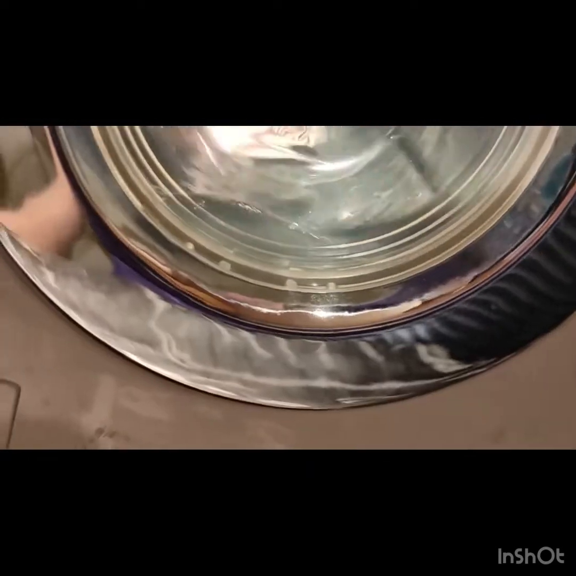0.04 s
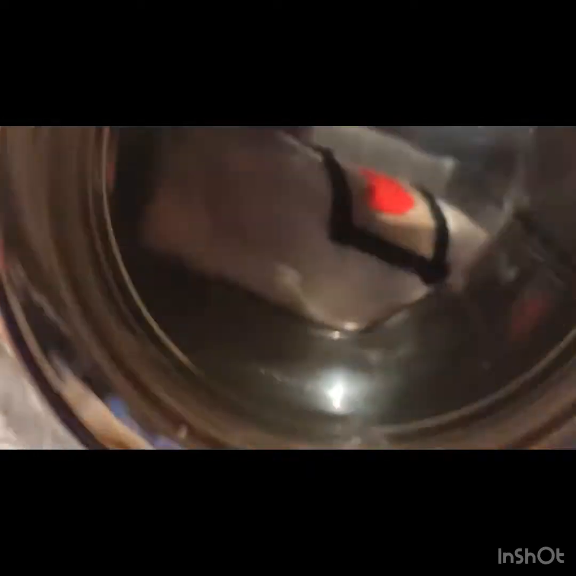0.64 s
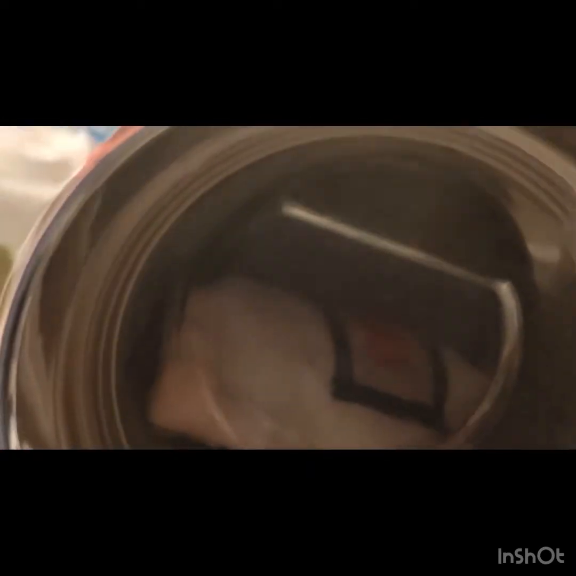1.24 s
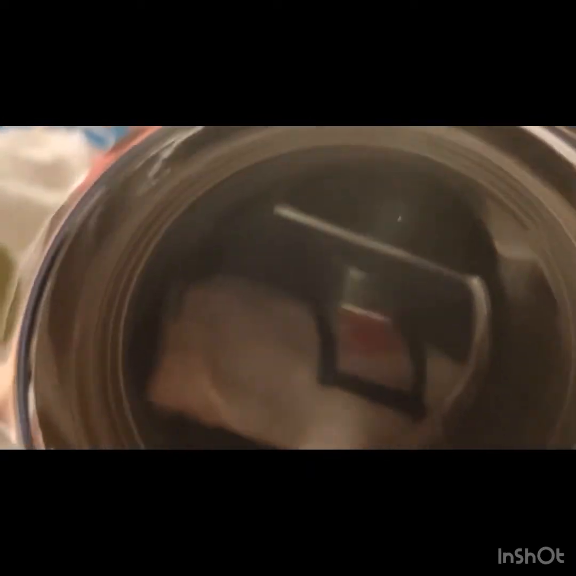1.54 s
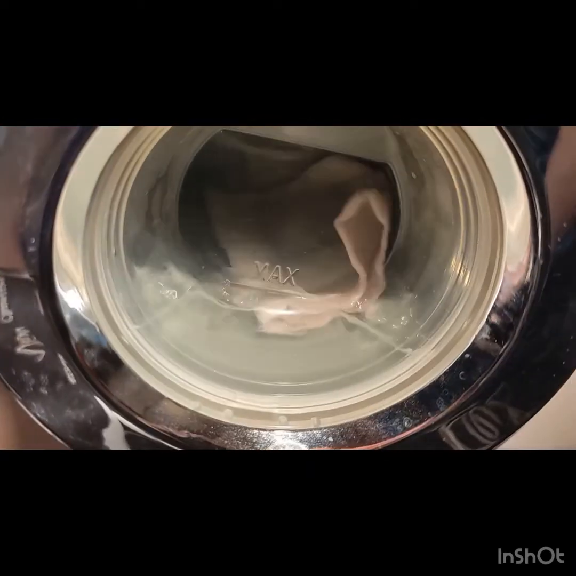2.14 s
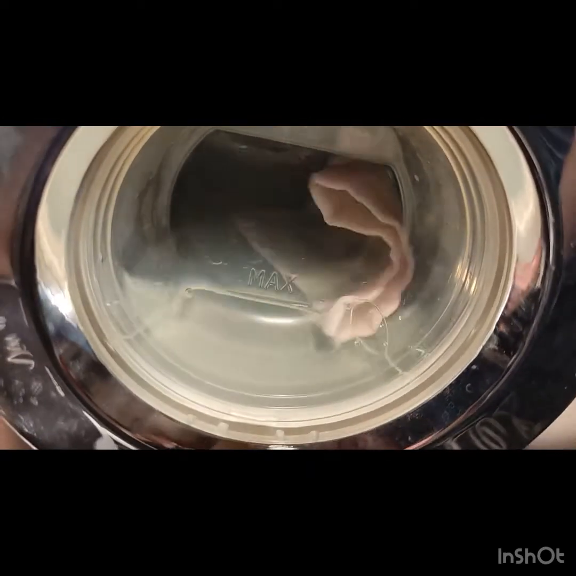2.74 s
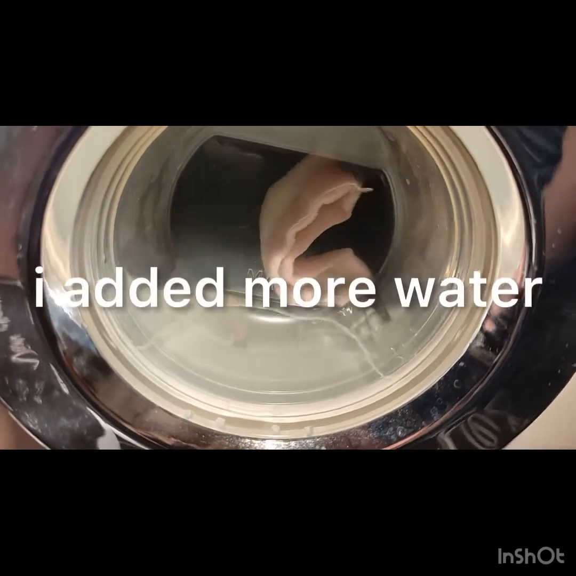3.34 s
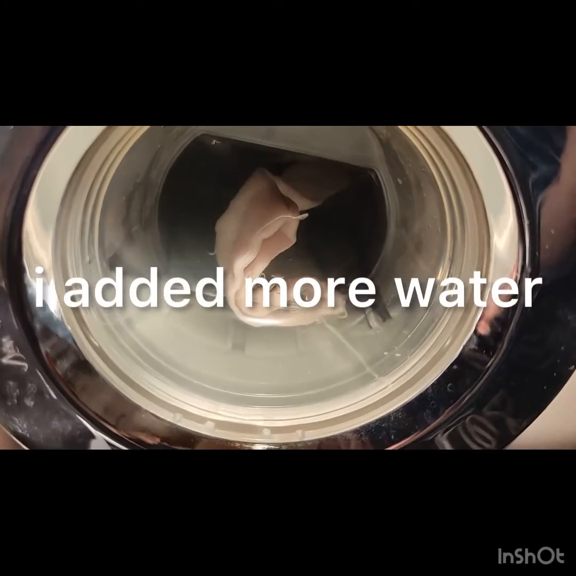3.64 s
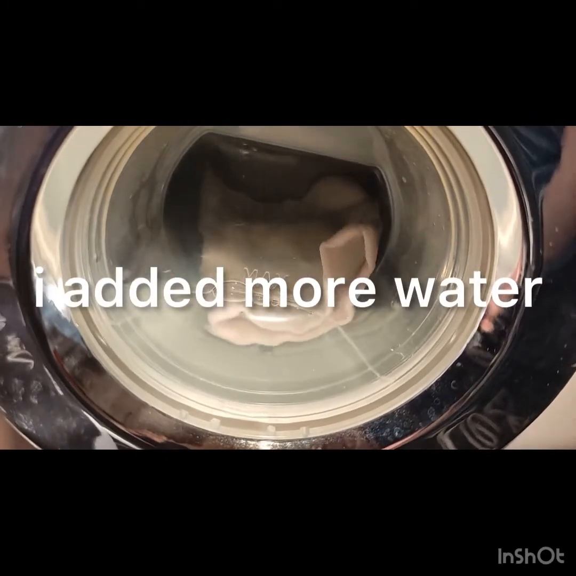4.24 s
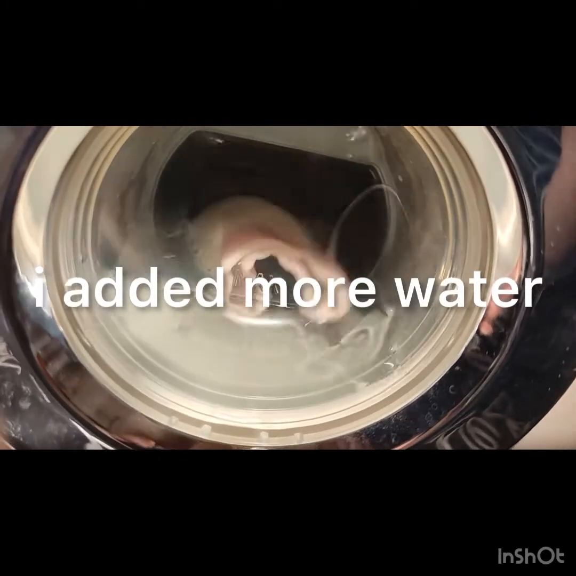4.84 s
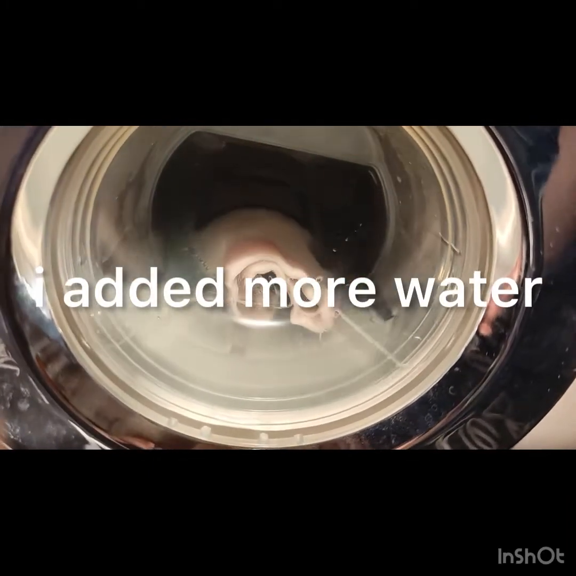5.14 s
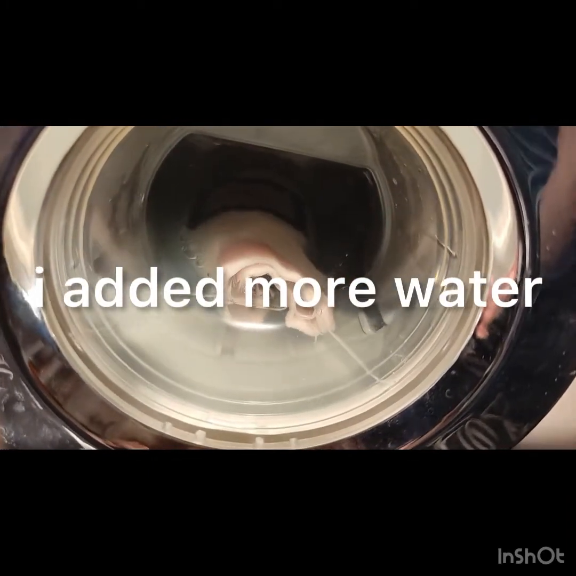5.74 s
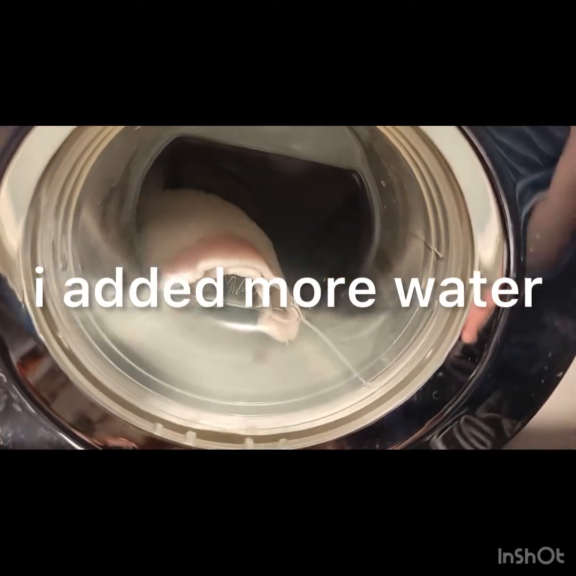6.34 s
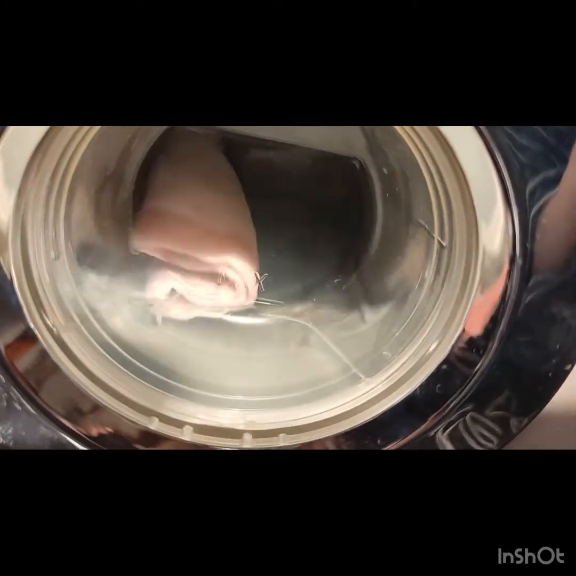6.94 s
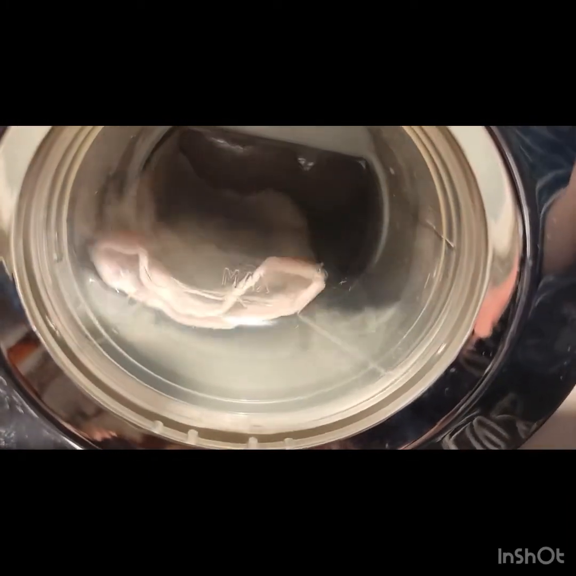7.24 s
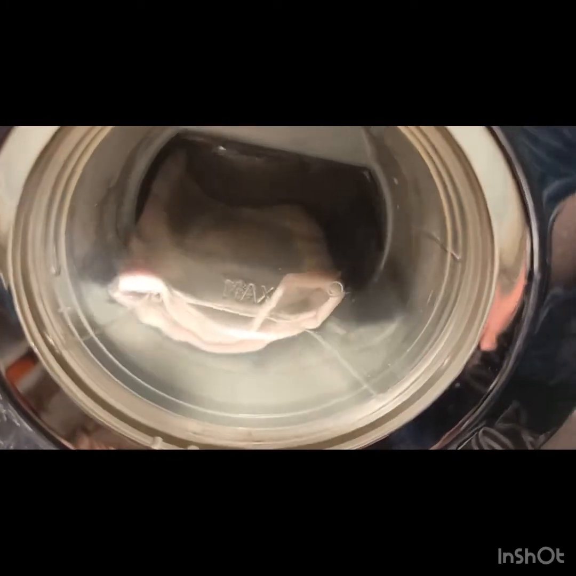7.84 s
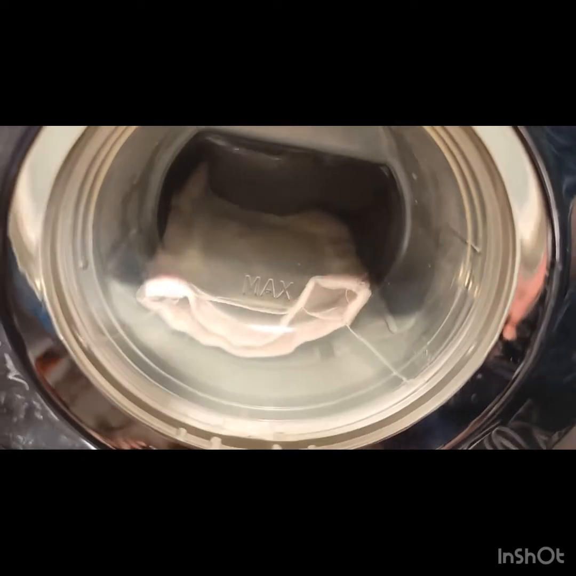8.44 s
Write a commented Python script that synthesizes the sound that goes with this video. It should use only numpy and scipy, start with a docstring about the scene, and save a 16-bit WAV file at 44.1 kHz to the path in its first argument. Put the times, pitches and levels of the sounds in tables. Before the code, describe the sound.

A small toy washer hums low while little waves and a wet cloth knock irregularly in its plastic tub, dripping and gurgling.

```python
"""Small waves slap and thump in a humming toy washing machine, heard just in front of its plastic door.
The drum turns a wet cloth in a little water: waves smack the wall and trap bubbles, cloth and water
knock the hollow tub, motor and drum keep its modes ringing. Water trickles and fizzes; droplets tick.
Early on, something brushes past the right microphone and the sound drops out for a moment."""
import sys
import numpy as np
from scipy import signal
from scipy.fft import rfft, irfft
from scipy.io import wavfile
from scipy.ndimage import uniform_filter1d

SR = 44100
rng = np.random.default_rng(int(sys.argv[2]) if len(sys.argv) > 2 else 0)


def materialize(psi):
    """Save the field psi as 16-bit PCM at rate SR to the path in sys.argv[1].

    A 1-D psi becomes a single channel; in a 2-D psi each row is a channel.
    """
    bounded = np.clip(np.atleast_2d(psi).T, -1, 1)
    quanta = np.round(bounded * 32767).astype(np.int16)
    wavfile.write(sys.argv[1], SR, quanta)


N = 378819
T = np.arange(N) / SR
EVENT_T = T[:SR // 3]
SWELL_LEAD_S = .04  # a wave swells this long before it hits
SLAP_HZ = 956  # reference pitch; smaller air pockets sound higher
# Low modes of tub and water: freq_hz, gain_db, t60_s
TUB_MODES = [(76, -29.5, 0.22), (117.3, -9.5, 0.15), (153, -12, 0.17), (175, -9, 0.22), (190.4, -2, 0.24),
             (231.8, -6, 0.16), (242.1, -0.5, 0.17), (280, -8.5, 0.18), (306, -3, 0.23), (363, -0.5, 0.18),
             (405.8, -3.5, 0.19)]
# Spectrum of droplets and foam: freq_hz, gain_db
DROPLET_EQ = [(1000, -11), (3000, -6.5), (5500, 0.5), (9000, 0.5), (12500, -11.5), (15500, -18)]


def waves():
    """Each wave slaps the wall, then thumps the tub; big ones land in two or three quick blows."""
    # Wave hits, before trims: start_s, slap_db, thump_db, thud_db, spray_db, pitch_hz
    hits = [(0.009, -30, -32.5, -60, -50.5, 970), (0.1, -42.5, -47, -60, -58, 1095),
            (0.269, -43, -51, -66, -79, 1350), (0.292, -40, -41, -64, -76, 926),
            (0.48, -46, -47.5, -54, -66, 1120), (0.514, -42, -41.5, -53, -74, 1250),
            (0.531, -43.5, -39, -59, -81, 850), (0.769, -39, -40, -48, -53.5, 1034),
            (0.831, -43.5, -44.5, -60, -85, 846), (0.956, -43, -48, -58, -69, 1030),
            (1.641, -36.5, -49.5, -53, -51.5, 1047), (1.969, -35, -30, -44, -57, 704),
            (2.006, -42.5, -41, -53, -61, 1420), (2.063, -34, -39.5, -53, -56, 930),
            (2.075, -39.5, -44, -58, -49.5, 835), (2.107, -34, -36, -52, -46.5, 980),
            (2.36, -45.5, -46.5, -56.5, -76, 1014), (2.437, -47, -70, -73, -64.5, 930),
            (2.588, -42, -36, -57, -62.5, 800), (2.909, -42.5, -39.5, -47.5, -53, 860),
            (2.917, -33.5, -31, -41, -54, 984), (3.025, -41.5, -37, -47.5, -63, 680),
            (3.077, -41.5, -57, -54, -53, 1480), (3.666, -44, -43, -60, -64, 950),
            (3.686, -46, -41, -55, -61, 1060), (3.702, -35, -47, -53, -45.5, 1134),
            (3.71, -47, -37.5, -51, -61, 810), (3.776, -42.5, -42, -57, -60, 810),
            (3.864, -35.5, -35, -50, -58, 777), (3.953, -30.5, -35, -52, -42, 913),
            (3.965, -43, -30, -52, -68, 960), (3.997, -45.5, -42, -57, -72, 720),
            (4.248, -46.5, -57, -60, -64, 946), (4.543, -43, -48, -54, -41, 1190),
            (4.569, -44, -43.5, -48.5, -56, 1050), (4.582, -52, -58, -53, -44.5, 1230),
            (4.637, -43, -46.5, -66, -45.5, 1050), (4.841, -52, -63, -59, -52, 1100),
            (5.385, -45, -54.5, -62, -55, 940), (6.09, -36.5, -38, -67, -57.5, 860),
            (6.225, -39.5, -51, -71, -53, 1050), (6.294, -42, -41.5, -55, -57, 950),
            (6.799, -42.5, -40, -52, -62, 710), (6.821, -37.5, -38, -48.5, -46.5, 720),
            (6.831, -38.5, -38, -54, -53.5, 602), (7.301, -46, -75, -73, -52.5, 1500),
            (7.375, -40.5, -35.5, -61, -50, 784), (7.387, -33, -37, -48, -52, 880),
            (7.491, -43, -56, -60, -55.5, 1120), (7.639, -38.5, -50, -64, -52.5, 1064),
            (7.722, -38, -43.5, -49, -55, 940), (7.735, -39, -40, -49, -57, 910),
            (7.801, -40, -42, -51.5, -64, 753), (7.831, -43, -40.5, -47, -48.5, 1040),
            (7.843, -34, -32.5, -40, -45.5, 980), (7.923, -52, -58, -60, -54.5, 1310),
            (8.181, -39, -30, -48, -55, 796), (8.406, -40.5, -45.5, -54.5, -67, 986),
            (8.448, -41.5, -51, -56, -65, 1063)]
    out = np.zeros((2, N))
    for start_s, slap_db, thump_db, thud_db, spray_db, pitch_hz in hits:
        add(out, start_s - SWELL_LEAD_S - .001003, slap(slap_db - 8, spray_db - 6.5, pitch_hz))
        add(out, start_s + .00098, thump(thump_db - 1, thud_db + 1))
    return out


def slap(slap_db, spray_db, pitch_hz, rise_s=.00044, smack_s=.0037, swell_s=.018, drain_s=.04):
    """A wave swells, smacks the wall unevenly, traps bubbles and drains; fine spray crackles with it."""
    lead = int(SWELL_LEAD_S * SR)
    t = EVENT_T[:SR // 6] - lead / SR
    n, after = len(t), np.maximum(t, 0)

    def uneven(spread_db, hold):
        return undb(spread_db * np.repeat(np.clip(rng.standard_normal(n), -2, 2), hold)[:n])

    def trapped(low_hz, high_hz):
        return np.pad(bubbles(low_hz, high_hz, spread_s=.003667, cycles=4.85, count=8), (lead, n))[:n]

    smack = (1 - np.exp(-after / rise_s)) * np.exp(-after / smack_s) * uneven(3, hold=96)
    wash = undb(-31) * np.exp(np.minimum(t, 0) / swell_s - after / drain_s) * uneven(4, hold=96)
    body = (smack + 1.87 * wash) * rng.standard_normal(n)
    body += undb(-18) * trapped(pitch_hz / 1.802, pitch_hz * 1.47)
    spray = (smack + wash) * uneven(5, hold=16) * rng.standard_normal(n)
    spray += undb(-27) * trapped(2050, 4200)
    # Slap spectrum at SLAP_HZ: freq_hz, gain_db
    slap_eq = [(250, -32), (450, -0.5), (570, -1), (1100, 3), (1600, -4), (2200, -16.5), (4000, -51.5)]
    # Spray spectrum: freq_hz, gain_db
    spray_eq = [(1000, -22), (1900, -3), (2400, 4), (3000, -3), (4000, 4), (5000, -9), (6300, -18.5),
                (8000, -11.5), (15000, -39)]
    body = colour(body, np.array(slap_eq) * [np.sqrt(pitch_hz / SLAP_HZ), 1])
    spray = colour(spray, np.array(spray_eq) * [rng.uniform(.94, 1.06), 1])
    path = door()
    return peak(ring(body, path), slap_db, window=88) + peak(ring(spray, path), spray_db, window=88)


def thump(thump_db, thud_db, push_s=.0045, jostle_s=.044, thud_s=.012, detune=.04):
    """Push, rebound and jostle ring the water-detuned tub over a deep thud; hard pushes knock drier."""
    push_hz = 252 * (1 + .063 * rng.standard_normal())

    def push(t):
        return t / push_s * np.exp(-2 * t / push_s) * np.sin(2 * np.pi * push_hz * t)

    rebound_s = .01691 * rng.uniform(.7, 1.3)  # the water falls back
    rebound = undb(-11) * push(np.maximum(EVENT_T - rebound_s, 0))
    jostle = undb(-19) * np.exp(-EVENT_T / jostle_s) * rng.standard_normal((2, len(EVENT_T)))
    tub = modes(TUB_MODES, 1 + detune * rng.standard_normal())
    knock = peak(push(EVENT_T)[None], thump_db + 28, window=176)
    body = peak(ring(push(EVENT_T) + rebound + jostle, tub), 0, window=176)
    hollow_eq = [(60, -16), (150, -2), (240, -1), (420, 4), (520, 1.5), (900, -24.5), (3000, -53.5)]
    hollow = colour(knock + body, hollow_eq)
    thud_hz = 140 * rng.uniform(.8, 1.2)
    thud = EVENT_T * np.exp(-2 * EVENT_T / thud_s) * np.sin(2 * np.pi * thud_hz * EVENT_T)
    return peak(hollow, thump_db, window=176) + peak(ring(thud, tub), thud_db, window=176)


def cloth_falls():
    """The wet cloth drops on the tub: a thump without a slap."""
    # Cloth impacts, before trims: start_s, thump_db, thud_db
    falls = [(0.078, -35.5, -70), (0.551, -28, -54), (0.589, -35, -58), (.908, -39.5, -74),
             (2.678, -42, -63), (2.954, -39, -52), (3.138, -38, -58), (3.153, -36, -49), (3.728, -38, -58),
             (3.983, -34, -59), (4.169, -41, -61), (4.423, -37.5, -44), (4.5, -40, -51.5),
             (4.654, -36, -55), (4.875, -48, -71), (5.14, -47, -67), (6.049, -44.5, -67), (6.166, -42, -73),
             (6.202, -44, -69), (6.488, -38.5, -77), (6.557, -42, -65), (6.602, -43.5, -67),
             (7.13, -45.5, -66), (7.51, -37, -64), (7.745, -34.5, -59), (7.971, -39, -56),
             (8.01, -40.5, -59), (8.154, -37, -60), (8.315, -39, -69), (8.461, -37.5, -63)]
    out = np.zeros((2, N))
    for start_s, thump_db, thud_db in falls:
        add(out, start_s, thump(thump_db - 6, thud_db + 3))
    return out


def hum(stir_db, detune=.051, waver_db=4):
    """Motor and drum shake the tub; its modes sit lower or higher as the water shifts."""
    tub = 0
    for stretch in (1 - detune, 1, 1 + detune):
        shake = rng.standard_normal(N) + undb(-5) * rng.standard_normal((2, N))
        tub += ring(shake, modes(TUB_MODES, stretch)) * undb(waver_db * wander(11))
    rumble_eq = [(35, -23), (62, 6), (160, -.5), (250, .5), (420, -7.5), (600, -14.5),
                 (1500, -7), (5000, -33.5)]
    return level(colour(tub, rumble_eq), 5.5) * undb(stir_db)


def drone(pitch_hz=246, t60_s=.16, waver_db=3):
    """The rubbing drum keeps one strong tub mode droning, rough and wavering."""
    # Drone envelope: time_s, level_db
    envelope = [(0, -66), (2.3, -64), (5.22, -63), (5.28, -72), (6.0, -71), (6.1, -53), (6.6, -54),
                (6.76, -65)]
    rubbed = ring(rng.standard_normal(N), modes([(pitch_hz, 0, t60_s)]))
    narrowed = ring(rubbed, modes([(pitch_hz, 0, t60_s / 2)]))
    return level(narrowed, 0) * undb(curve(envelope) + waver_db * wander(13))


def ripples(stir_db, count=22):
    """Small waves lap at loose intervals, louder with harder stirring."""
    out = np.zeros((2, N))
    for k in range(count):
        start_s = (k + rng.random()) / count * T[-1]
        base_db = stir_db[int(start_s * SR)] + 3 * rng.uniform(-.2, 1)
        add(out, start_s - SWELL_LEAD_S, slap(base_db + 3, base_db - 8, SLAP_HZ))
        add(out, start_s, thump(base_db + 9, base_db))
    return out


def swishes():
    """The dragging cloth squeezes out rushes of drops and foam that swell and fade."""
    # Cloth drags, before trims: centre_s, width_s, drops_db, fizz_db
    drags = [(0.508, 0.16, -93, -68), (2.058, 0.13, -58.5, -64.5), (2.867, 0.09, -62, -70),
             (3.151, 0.07, -61, -77), (3.705, 0.019, -54, -80), (3.885, 0.055, -63.5, -80),
             (4.552, 0.013, -48, -71), (4.582, 0.14, -59.5, -68), (7.131, 0.067, -63, -65.5),
             (7.246, 0.061, -63, -88), (7.862, 0.12, -61, -68.5), (8.135, 0.13, -66.5, -73.5)]
    # Spectrum of the drops: freq_hz, gain_db
    drops_eq = [(400, -11), (1000, 6.5), (2400, 2), (3100, -1), (4300, -1.5), (6300, -20), (12000, -36)]
    centre_s, width_s, drops_db, fizz_db = np.transpose(drags)[:, :, None]
    swell = np.exp(-2 * ((T - centre_s) / width_s) ** 2)
    drops = colour(ring(patter(rate_hz=900, spread_db=5), door()), drops_eq)
    fizz = colour(np.array([patter(rate_hz=3500, spread_db=5) for _ in range(2)]), DROPLET_EQ)
    return (level(drops, 0) * (swell * undb(drops_db)).sum(axis=0)
            + level(fizz, -6) * (swell * undb(fizz_db)).sum(axis=0))


def plinks(ring_s=.001, spread_s=.002, glide=.07):
    """A bubble's film tears with a wet crackle; it splits into a few of like size that ring briefly."""
    # Bubble pops, plus three small water laps played the same way (the low rows at 1.17, 5.172 and 6.969 s),
    # before trim: start_s, level_db, pitch_hz
    pops = [(1.17, -57, 1000), (2.673, -56.5, 5800), (2.88, -56, 3150), (3.102, -56.5, 5650),
            (3.112, -47.5, 2600), (3.16, -53, 2350), (3.686, -53, 3150), (3.697, -54, 3900),
            (3.704, -44, 3950), (3.8308, -57.5, 3300), (3.855, -54, 3900), (4.547, -43, 2450),
            (4.546, -54, 4200), (4.581, -48.5, 4920), (4.623, -52, 2620), (4.638, -42, 6100),
            (4.962, -56.5, 4670), (5.172, -51.5, 1100), (6.823, -50, 4230), (6.969, -55, 1390),
            (7.172, -58, 4330), (7.375, -59, 3970), (7.546, -48, 2300), (7.673, -49, 3350),
            (7.7224, -49.5, 3400), (8.001, -57, 4000)]
    out = np.zeros((2, N))
    for start_s, level_db, hz in pops:
        onset_hz = hz / (1 + glide)
        blip = bubbles(onset_hz / 1.1, onset_hz * 1.1, spread_s, ring_s * hz, count=4, glide=glide)
        tear = undb(-1) * np.exp(-EVENT_T[:len(blip)] / spread_s) * rng.standard_normal(len(blip))
        tear = colour(tear, [(hz / 3, -18), (hz / 1.18, 0), (hz, 7), (hz * 1.1, 0), (hz * 3, -26)])
        path = door(ring_db=-45, drum_db=-20, drum_s=.0075, room_db=-55, room_s=.031)
        add(out, start_s - .001, peak(ring(blip + tear, path), level_db - 3, window=88))
    return out


def ticks(crack_s=.000091, grain_db=5):
    """Droplets hit the door: a sharp crack, ringing pinhead bubbles, then a finer spatter."""
    # Droplet hits, before trim: start_s, level_db, spatter_t60_s, low_edge_hz
    droplets = [(.099, -56, .085, 3000), (1.715, -54, .011, 3000), (2.117, -56, .098, 3000),
                (2.918, -55, .022, 4000), (3.431, -46.5, .056, 8000), (3.437, -45.5, 0.14, 6900),
                (3.939, -56.5, 0.11, 3970), (4.423, -49, .12, 4000), (4.638, -52, 0.039, 3000),
                (4.834, -52.5, .15, 3000), (5.361, -47.5, 0.13, 6000), (5.417, -46.5, 0.013, 6460),
                (6.224, -55, .024, 4000), (7.045, -45, .021, 9000), (7.296, -55, .028, 9000),
                (7.386, -50, .018, 4000), (8.521, -47, 0.2, 4900)]
    out, t = np.zeros((2, N)), EVENT_T[:SR // 10]
    for start_s, level_db, t60_s, edge_hz in droplets:
        grains_db = grain_db * np.repeat(rng.standard_normal(len(t)), 32)[:len(t)]
        spatter = undb(grains_db - 15 - 60 * t / t60_s)
        crack = (np.exp(-t / crack_s) + spatter) * rng.standard_normal((2, len(t)))
        pinheads = undb(-7) * bubbles(8070, 11870, spread_s=.0013, cycles=22, count=2)[:len(t)]
        thin = colour(crack + pinheads, [(edge_hz / 2, -16), (edge_hz, 0)])
        add(out, start_s, peak(colour(thin, DROPLET_EQ), level_db - 4.5, window=44))
    return out


def brush(left_db=-20, rough_db=1.5):
    """A dry rub swells right beside the right microphone."""
    # Rub envelope: time_s, gain_db
    envelope = [(1.2, -77), (1.215, -64), (1.42, -60.5), (1.5, -55.5), (1.6, -46.5), (1.625, -46),
                (1.67, -75), (1.73, -57.5), (1.76, -85)]
    # Rub spectrum: freq_hz, gain_db
    rub_eq = [(100, -1), (350, 16), (700, 3.5), (1500, 0), (3000, -5.5), (4500, -3.5), (7000, -7.5),
              (10000, -1.5), (12000, -13), (15000, -17)]
    rub = level(colour(rng.standard_normal(N), rub_eq), 1)
    return rub * undb(curve(envelope) + rough_db * wander(59.97)) * undb([[left_db], [0]])


def squirt(start_s=7.05, rise_s=.0025, fade_s=.042):
    """A fold of cloth squeezes out a thin, whistling jet."""
    # Jet resonances: freq_hz, gain_db, t60_s
    jet_modes = [(2100, -6, 0.0046), (10150, 3.5, 0.0029)]
    after = np.maximum(T - start_s, 0)
    jet = ring(rng.standard_normal((2, N)), ring(modes(jet_modes), modes(jet_modes)))
    return level(jet, -65) * (1 - np.exp(-after / rise_s)) * np.exp(-after / fade_s)


def squelch(centre_s=7.135, width_s=.05):
    """Air bubbles softly out of the sinking cloth."""
    # Air pocket resonances: freq_hz, gain_db, t60_s
    pocket_modes = [(1950, -7, 0.0077), (4930, 1, 0.002)]
    pocket = modes(pocket_modes)
    bursts = ring(ring(patter(rate_hz=700, spread_db=3), pocket), pocket)
    return level(ring(bursts, door()), -66) * np.exp(-2 * ((T - centre_s) / width_s) ** 2)


def trickle(stir_db, spots=5, waver_db=2):
    """Drops run off the cloth and land on several spots in the drum."""
    # Trickle spectrum: freq_hz, gain_db
    trickle_eq = [(300, -18.5), (600, 4.5), (1100, 2.5), (2000, -7.5), (2500, -4.5), (3100, -8),
                  (4200, -5.5), (6000, -12), (15000, -19)]
    drops = sum(ring(patter(rate_hz=160, spread_db=1), door()) for _ in range(spots))
    return level(colour(drops, trickle_eq), -5) * undb(stir_db + waver_db * wander(13))


def gurgle(stir_db, low_hz=750, high_hz=4500, tilt_db=-7, count=600):
    """Quickly damped bubbles cluck in the stirred water, the small high ones fainter."""
    out, t = np.zeros((2, N)), EVENT_T[:SR // 25]
    paths = [door()[:, :len(t)] for _ in range(6)]
    for k, (when, smallness, chance) in enumerate(rng.random((count, 3))):
        turns = t * low_hz * (high_hz / low_hz) ** smallness
        cluck = np.exp(-turns / 2.7) * np.sin(2 * np.pi * turns)
        gain_db = tilt_db * smallness - np.log(max(chance, .03))
        add(out, when * T[-1], undb(gain_db) * ring(cluck, paths[k % 6]))
    return level(out, -10) * undb(stir_db)


def foam(stir_db, waver_db=2):
    """Fine bubbles burst wherever the water runs."""
    fizz = colour(np.array([patter(rate_hz=3900, spread_db=1) for _ in range(2)]), DROPLET_EQ)
    return level(fizz, -17) * undb(stir_db + waver_db * wander(21))


def air():
    """Still air and microphone hiss."""
    # Noise floor spectrum: freq_hz, gain_db
    floor_eq = [(20, -116), (42, -107), (62, -101), (100, -92), (160, -105), (250, -91), (500, -99),
                (1000, -100), (2000, -110), (4000, -113), (7000, -115), (12000, -112), (16000, -115)]
    return colour(rng.standard_normal((2, N)), floor_eq)


def door(ring_db=-44.5, drum_db=-21, drum_s=.0083, room_db=-46, room_s=.062):
    """Stereo path from one spot in the drum: door modes, shifted by the water, plus reflections."""
    # Modes of the door and the air behind it: freq_hz, gain_db, t60_s
    door_modes = [(566.7, 2.5, 0.092), (652, -1.5, 0.055), (775, -1.5, 0.071), (900, -2, 0.08),
                  (1007, -4, 0.12), (1164, -2, 0.09), (1635, 0, 0.024), (1830, -9, 0.038),
                  (2200, -13, 0.033), (2343, -4.5, 0.049), (2562, 0, 0.08), (3390, -5, 0.06),
                  (3970, 3, 0.12)]
    t = EVENT_T[:SR // 8]
    left = undb(ring_db) * modes(door_modes, 1 + .015 * rng.standard_normal())[:len(t)]
    left[0] += 1  # direct sound
    right = np.pad(left, (rng.integers(14), 0))[:len(t)]  # up to 13 samples later
    tail = undb(drum_db) * np.exp(-t / drum_s) + undb(room_db) * np.exp(-t / room_s)
    return np.array([left, right]) + tail * rng.standard_normal((2, len(t)))


def bubbles(low_hz, high_hz, spread_s, cycles, count, glide=.11):
    """A handful of bubbles, each ringing briefly and rising in pitch."""
    when, smallness, strength = rng.random((count, 3)).T[:, :, None]
    pitch_hz = low_hz * (high_hz / low_hz) ** smallness
    turns = np.maximum(EVENT_T[:SR // 8] - 2 * when * spread_s, 0) * pitch_hz
    fade = np.exp(-turns / cycles)
    return (strength * fade * np.sin(2 * np.pi * turns * (1 + glide * (1 - fade)))).sum(axis=0)


def patter(rate_hz, spread_db):
    """Random tiny impacts of uneven size."""
    hit = rng.random(N) < rate_hz / SR
    sign = rng.choice([-1, 1], N)
    return hit * sign * undb(spread_db * np.minimum(rng.exponential(size=N), 4))


def modes(table, stretch=1):
    """Impulse response of damped modes, frequencies scaled by stretch."""
    hz, db, t60_s = np.transpose(table)[:, :, None]
    return (undb(db - 60 * EVENT_T / t60_s) * np.cos(2 * np.pi * hz * stretch * EVENT_T)).sum(axis=0)


def wander(rate_hz):
    """Smooth random drift with a spread near 1."""
    hold = int(SR / rate_hz)
    steps = np.repeat(rng.standard_normal(N // hold + 1), hold)
    return 1.3 * uniform_filter1d(uniform_filter1d(steps, hold), hold)[:N]


def colour(x, points, size=4096):
    """Minimum-phase filter through (freq_hz, gain_db) points."""
    hz, db = np.transpose(points)
    bins_db = np.interp(np.log(np.fft.rfftfreq(size, 1 / SR) + 1), np.log(hz), db)
    cepstrum = irfft(np.log(undb(bins_db)))[:size // 2]
    cepstrum[1:] *= 2
    return ring(x, irfft(np.exp(rfft(cepstrum, size)))[:size // 2])


def ring(x, response):
    """Convolve with an impulse response; either may be stereo."""
    return signal.fftconvolve(np.atleast_2d(x), np.atleast_2d(response))[:, :x.shape[-1]]


def undb(db):
    """Decibels to gain."""
    return 10 ** (np.asarray(db) / 20)


def curve(rows):
    """Interpolate (time_s, value) rows at every sample."""
    return np.interp(T, *np.transpose(rows))


def level(x, db):
    """Set the rms level of the channel mean."""
    return x * undb(db) / x.mean(axis=0).std()


def peak(x, db, window):
    """Set the rms level of the loudest `window` samples."""
    return x * undb(db) / np.sqrt(uniform_filter1d(x.mean(axis=0) ** 2, window).max())


def add(out, start_s, x):
    """Mix x in at start_s, cropped to fit."""
    i = int(min(start_s * SR, N - 1))
    x, i = x[:, max(-i, 0):], max(i, 0)
    out[:, i:i + x.shape[-1]] += x[:, :N - i]


def scene():
    """The machine, its water nearer the left microphone, with the brush and still air."""
    # How hard the drum stirs the water: time_s, level_db
    stirring = [(0.0, -58.5), (0.21, -69.5), (1.2, -70), (2.03, -69.5), (3.07, -64), (3.22, -67.5),
                (3.49, -68), (3.78, -65), (4.2, -68.5), (4.6, -60.5), (4.73, -65.5), (4.85, -62),
                (5.3, -70.5), (5.99, -71), (6.16, -64.5), (6.76, -69), (7.05, -63.5), (7.82, -66.5),
                (8.59, -67.5)]
    # Stereo balance of the machine: freq_hz, left_minus_right_db
    balance = [(60, -1.5), (170, 5.5), (260, 3.5), (550, -0.5), (800, 4.5), (1300, 7), (2300, 13),
               (3200, 2.5), (4200, 4), (6000, 3)]
    stir_db = curve(stirring)
    machine = (hum(stir_db) + trickle(stir_db) + swishes() + plinks() + waves() + cloth_falls()
               + ripples(stir_db) + gurgle(stir_db) + squirt() + squelch() + drone())
    hz, lean_db = np.transpose(balance)
    machine = np.vstack([colour(x, np.c_[hz, side * lean_db / 2]) for x, side in zip(machine, (1, -1))])
    return machine + foam(stir_db) + ticks() + brush() + air()


def record(dry):
    """Each microphone port colours the treble; the sound drops out once; the top is cut."""
    # Port resonances: freq_hz, left_db, right_db
    ports = [(3540, -2.5, -1), (5850, -11, -3), (6710, -4, -3.5), (7060, -18, -10), (8740, -2, -9.5),
             (9100, -1, -9.5), (10260, -9, -4.5), (11760, 1.5, 10), (13400, 1, 3.5), (13600, -1.5, 2.5)]
    # Overall gain with one dropout: time_s, gain_db
    dropout = [(1.73, 4.5), (1.74, -26), (1.815, -51), (1.825, -4), (1.9, 7), (1.95, 6)]
    hz, *ports_db = np.transpose(ports)
    heard = np.vstack([colour(x, np.c_[hz, db]) for x, db in zip(dry, ports_db)])
    lowpass = signal.ellip(10, .2, 70, 15750, fs=SR, output="sos")
    return signal.sosfilt(lowpass, heard * undb(curve(dropout)))


dry = scene()
out = record(dry)
materialize(out)
```